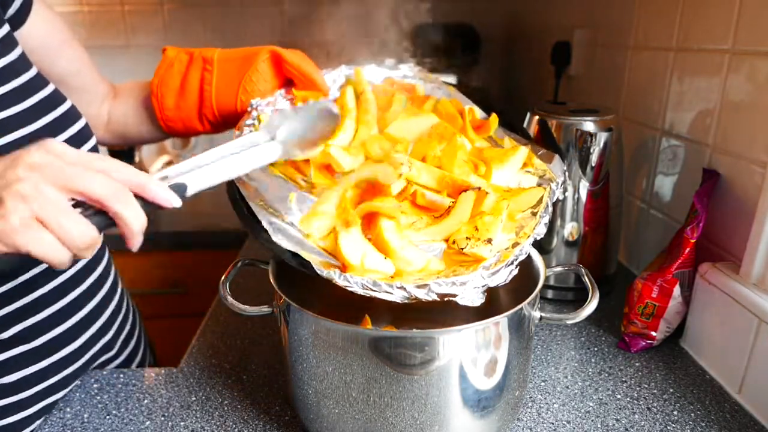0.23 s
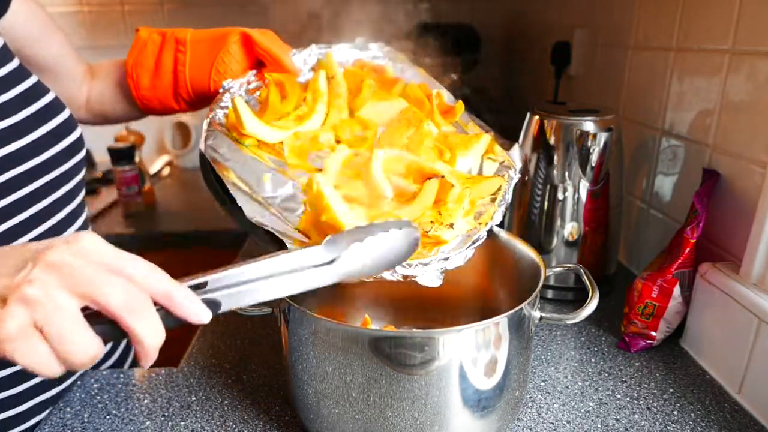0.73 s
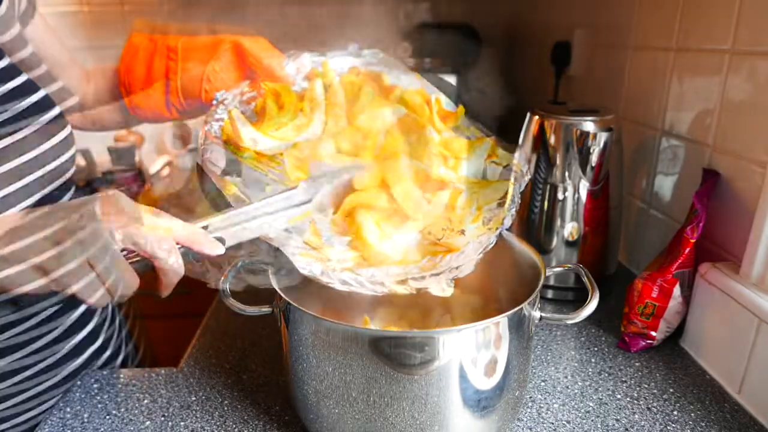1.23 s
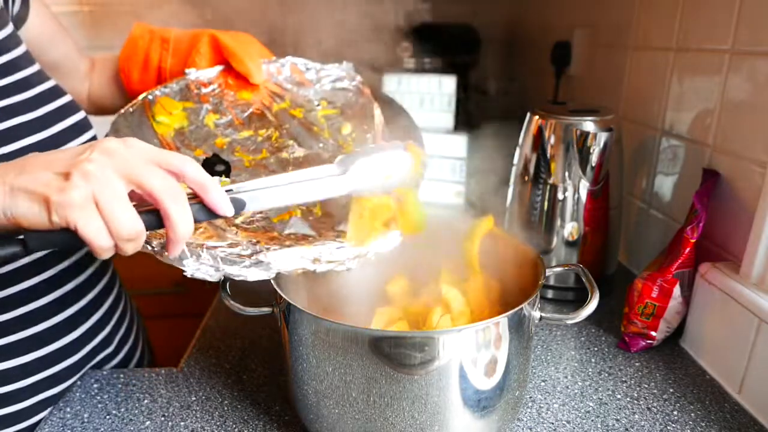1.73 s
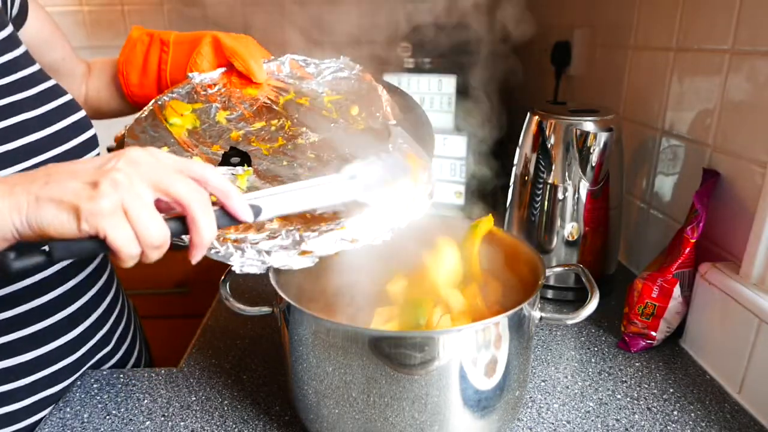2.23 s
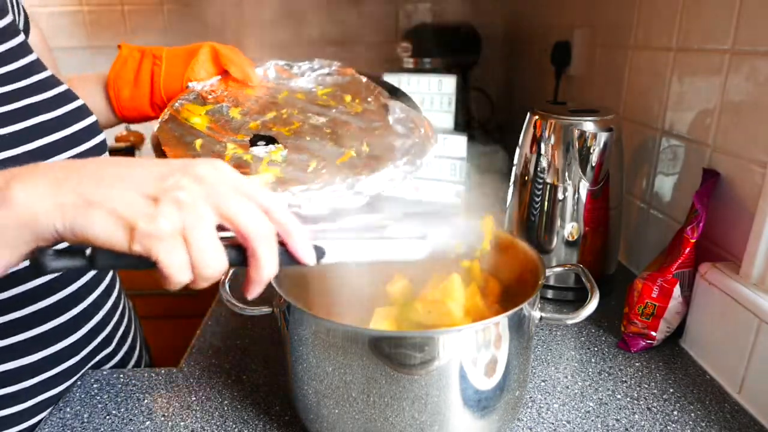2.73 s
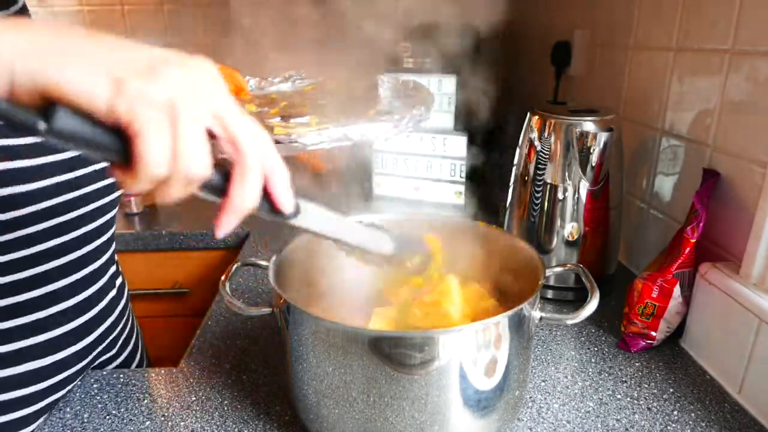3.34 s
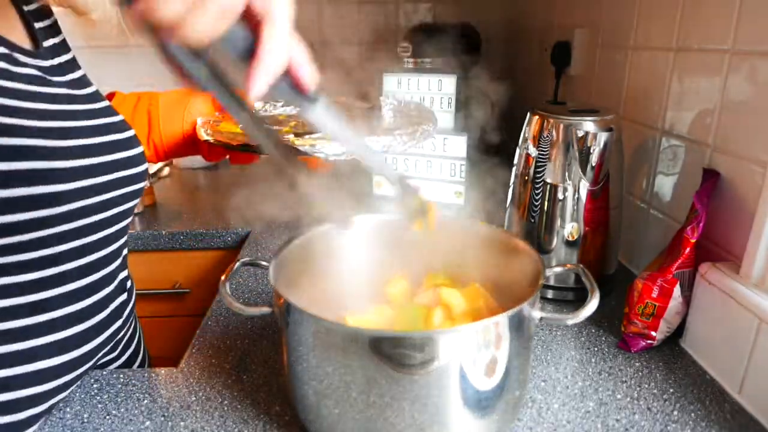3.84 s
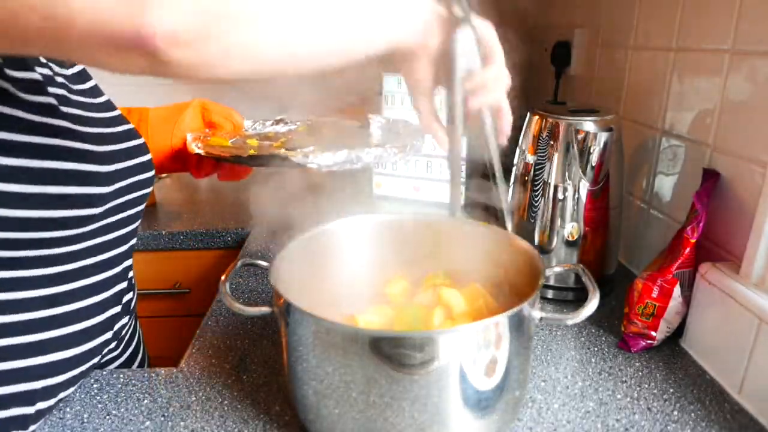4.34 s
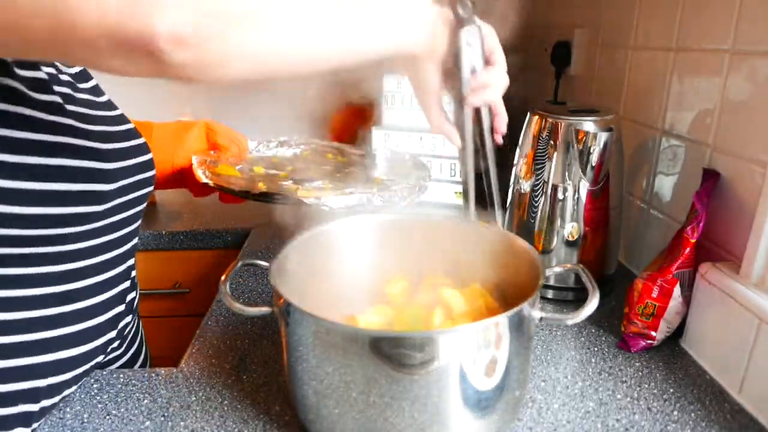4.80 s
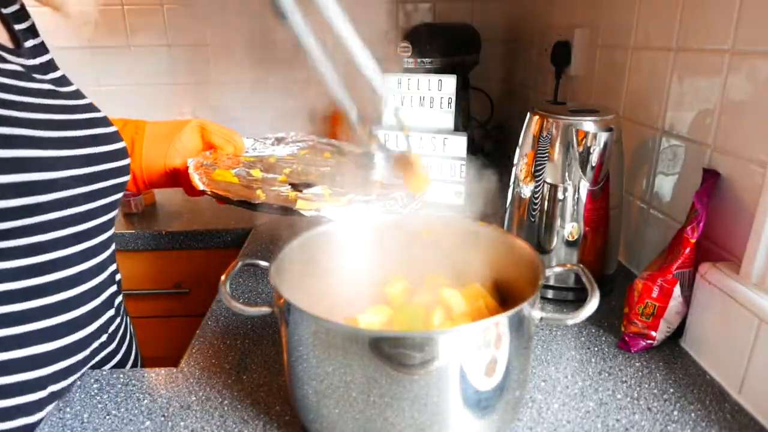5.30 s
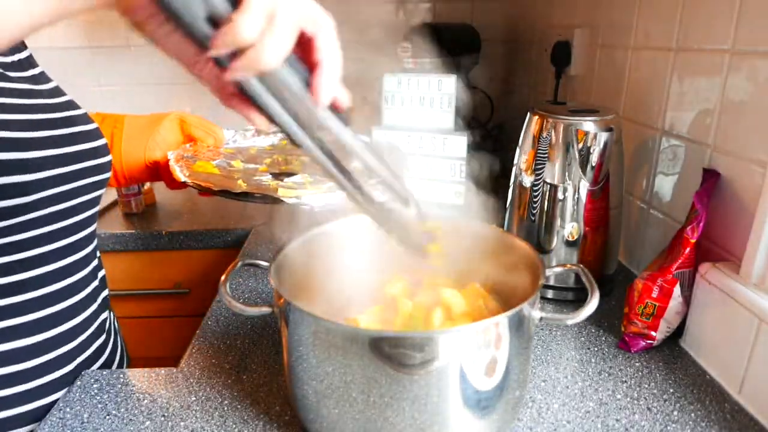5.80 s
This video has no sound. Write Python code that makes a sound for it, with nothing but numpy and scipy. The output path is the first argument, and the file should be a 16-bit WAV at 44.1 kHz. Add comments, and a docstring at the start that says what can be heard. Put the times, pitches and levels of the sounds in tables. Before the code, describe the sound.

Loud foil crackle, hissing scrapes and rumbling tray with soft pot thumps, then near silence, faint ticks and a single hollow clunk.

```python
"""A tiled kitchen, a stereo pair close to a foil-lined tray: steel tongs scrape roasted vegetables off it.
The foil crackles and hisses (dense clicks and noise), the tray rumbles under it (shaken resonances),
and pieces thump into a steel pot (beating low sines). Later come small foil ticks and one hollow knock
(ringing modes and a dense thud). Behind it all: the quiet drone of the kitchen with a mains hum."""
import sys
import numpy as np
from scipy import signal
from scipy.fft import rfft, irfft, next_fast_len
from scipy.io import wavfile

SR = 44100
rng = np.random.default_rng(int(sys.argv[2]) if len(sys.argv) > 2 else 0)


def waveform_to_disk(signal):
    """Save audio, clipped to [-1, 1], as 16-bit WAV at the path in sys.argv[1]."""
    frames = np.transpose(np.atleast_2d(signal))
    scaled = np.clip(frames, -1, 1) * 32767
    samples = np.round(scaled).astype(np.int16)
    wavfile.write(sys.argv[1], SR, samples)


N = 267242

# Level columns are relative: each source sets its final level in its own function.

# Spectrum of the appliances and distant air: pitch_hz, level_db
DRONE_SPECTRUM = [(70, -57), (120, -19), (230, -13.5), (350, -4.5), (410, -6.5), (480, -12.5), (620, -11.5),
                  (864, -8), (940, -15.5), (1450, -16), (2300, -22.5), (4200, -28.5), (6000, -27.5),
                  (8000, -32), (10000, -28.5), (15800, -36)]
# How alike the drone is at the two microphones: pitch_hz, likeness (-1 to 1)
DRONE_LIKENESS = [(60, -0.39), (150, 0.6), (380, 0.82), (950, -0.24), (2380, -0.17), (5980, 0.35),
                  (15000, 0.38)]
# Mains hum, before its slow drift: pitch_hz, level_db
HUM = [(100, -70), (200, -79), (300, -73), (400, -75)]
# Decay of the tiled room: pitch_hz, t60_s
ROOM_DECAY = [(150, 0.42), (500, 0.64), (2000, 0.9), (6000, 0.83), (15000, 0.13)]
# Stereo width of the room tail, side against mid: pitch_hz, side_db
ROOM_SPREAD = [(150, -14), (500, -11.5), (1500, -7), (15000, -5)]
# A blow and its rattling bounces: start_s, level_db
KNOCK_TOUCHES = [(4.523, -6.5), (4.536, -15), (4.547, -26.5), (4.572, -22)]
# Modes of the hollow body that is knocked: pitch_hz, level_db, t60_s
KNOCK_MODES = [(196, -4.5, 0.38), (229.7, -2, 0.2), (283, -14, 0.26), (346, -2, 0.28), (401, -1, 0.14),
               (550, -20, 0.4), (598, 5, 0.18), (652, 2, 0.23), (700, -6, 0.62), (774, -16, 0.22),
               (821, -5.5, 0.23), (898, -15, 0.44), (1000, -18, 0.18), (1142, -10, 0.13), (1273, -12, 0.14),
               (1332, -12, 0.18), (1425, -4, 0.23), (1633, -30, 0.26), (1740, -27, 0.36), (2340, -30, .3),
               (2520, -24, 0.22), (2930, -32, .35), (3075, -35, 0.37), (3860, -38, 0.47), (5000, -30, 0.21),
               (5060, -25, 0.13), (6150, -29, 0.2), (6780, -32, 0.18)]
# Spectrum of the dense part of the blow: pitch_hz, level_db
THUD_SPECTRUM = [(88, -50), (150, -27), (193, -4.5), (254, -10), (286, -5), (414, -11), (466, -10),
                 (601, -3), (837, -9.5), (979, -16.5), (1140, -11.5), (2020, -22.5), (4670, -38),
                 (6260, -34), (16000, -53)]
# Soft pieces landing in the pot: start_s, level_db, pitch_hz
THUMPS = [(0.342, -36.5, 207.6), (0.658, -25, 253), (1.05, -23.5, 256.2), (1.54, -23.5, 231.4),
          (1.801, -35.5, 238.4), (2.125, -33, 286), (2.901, -34, 250), (3.029, -46.5, 254),
          (5.508, -50, 291)]
# Thin metal rings of the tongs: start_s, level_db, pitch_hz, t60_s
PINGS = [(.311, -27, 2694, 0.13), (.311, -25, 3480, 0.035), (.311, -29, 4270, 0.036),
         (1.125, -36, 2015, 0.69), (1.475, -19.5, 3360, 0.027), (2.91, -59, 4400, 0.24),
         (2.92, -55, 7160, .08), (2.98, -56.5, 3610, .12), (3.035, -62, 3610, .12),
         (3.533, -49, 6120, 0.037), (3.537, -56, 2800, .1), (3.595, -68, 11800, 0.18)]
# The tongs bump the tray, which answers around one pitch: start_s, level_db, pitch_hz
BUMPS = [(.312, -33, 443), (.345, -29.5, 378), (.35, -27.5, 585), (.515, -25.5, 805), (.59, -19, 391),
         (.605, -23, 870), (.655, -29, 390), (.71, -24.5, 521), (.76, -18.5, 830), (.82, -28, 510),
         (1.17, -25.5, 815), (1.19, -27.5, 530), (1.468, -16.5, 915), (1.47, -29, 540), (1.56, -41, 775),
         (1.74, -24, 536), (1.765, -23, 790), (1.82, -29, 522), (2.125, -20, 830), (2.15, -23, 1140),
         (6.025, -48, 650)]
# Sharp snaps of the foil and touches of the tongs, loud while scraping, faint afterwards:
# start_s, level_db, pitch_hz
SNAPS = [(0.199, -21, 4700), (0.3102, -8.5, 2960), (0.3594, -20, 3900), (0.5594, -15, 4100),
         (0.6021, -11.5, 2450), (0.845, -7, 5230), (1.117, -11.5, 9200), (1.1776, -7, 2380),
         (1.257, -8.5, 3930), (1.472, -12, 3300), (1.633, -12, 9600), (1.728, -11.5, 5800),
         (1.787, -12, 3370), (2.051, -17.5, 5200), (2.1104, -5.5, 11100), (2.1265, -4, 5600),
         (2.153, -10, 1920), (2.197, -6.5, 9700), (2.622, -30, 4100), (3.155, -44, 9850),
         (3.1882, -37.5, 8900), (3.364, -29.5, 4960), (3.42, -44, 12000), (3.458, -42.5, 5370),
         (3.537, -41.5, 2840), (3.597, -42, 6000), (3.675, -43, 4900), (4.175, -44, 12700),
         (4.248, -47, 4030), (4.453, -33.5, 3540), (5.2794, -38.5, 5560), (5.4051, -43.5, 2980),
         (6.0264, -44, 2500)]
# Resonances of the tray: pitch_hz, width_hz, level_db
TRAY_MODES = [(141, 54, -23), (270, 25, -3), (372.4, 4.6, 7), (440, 30, 2), (522, 6.2, 2.5),
              (580, 16, -2.5), (641, 24, -7), (711, 27, -3.5), (770.5, 47, -1), (830, 17, 0), (932, 53, 1),
              (1040, 77, -3), (1167, 12.6, -4)]
# Spectrum of the foil: pitch_hz, level_db
FOIL_SPECTRUM = [(530, -34), (900, -3), (1060, -12.5), (1160, -6.5), (1430, -7), (1980, -6.5), (8000, -4.5),
                 (10000, -3), (14500, -6.5), (15600, -8.5)]
# Curves of four strokes of the tongs, then the foil faintly settling and a last light touch:
# start_s, rustle_db, treble_db (stretched in foil()), rumble_db
SCRAPE_CURVES = [
    [(0.0, -25, -2, -35.5), (0.08, -33, -8, -45.5), (0.15, -30, -3, -42.5), (0.22, -41, -5.5, -54),
     (0.3, -45, 0.5, -49)],
    [(0.31, -28, -7, -28.5), (0.35, -21, -6.5, -27), (0.42, -22.5, -4, -34), (0.46, -26, -6, -39.5),
     (0.56, -21.5, -6.5, -29.5), (0.61, -19.5, -5, -25.5), (0.73, -23, -9, -32.5), (0.79, -27, -4, -30.5),
     (0.99, -33.5, -8, -41), (1.04, -33, -12, -37.5), (1.1, -38.5, -18, -43)],
    [(1.13, -26, 1, -37), (1.18, -19.5, -8, -26), (1.22, -26.5, -2.5, -35), (1.35, -23.5, -3.5, -32.5),
     (1.46, -23.5, -3.5, -41), (1.48, -23.5, -13, -29), (1.6, -29.5, -7.5, -30), (1.64, -30, -1, -40),
     (1.7, -31, -2, -41.5), (1.75, -25.5, -2.5, -30.5), (1.99, -34.5, -4, -49.5), (2.1, -39.5, -0.5, -50)],
    [(2.13, -18.5, -3.5, -25.5), (2.23, -22, -4, -36.5), (2.3, -23.5, -3, -37.5), (2.38, -27, -2.5, -37.5),
     (2.44, -33, -4.5, -48), (2.57, -55, -4, -61), (2.66, -57, -2, -61.5), (2.85, -72, -27, -76)],
    [(2.95, -56.5, -16, -57), (3.29, -62, -15, -79), (3.38, -55, -20, -72), (3.85, -61.5, -20, -63),
     (3.92, -95, -15, -95)],
    [(5.99, -95, -15, -63), (6.026, -54, -17, -43.5), (6.06, -49, -15, -55)],
]
# Where the tray sounds most, one value per curve: four strokes, the settling, the last touch: pitch_hz
CONTACT_HZ = [537, 620, 660, 820, 450, 600]
# Edges of the half-octave bands of the room tail: pitch_hz
BAND_EDGES_HZ = 25 * 2 ** np.arange(0, 9.6, .5)

DRONE_DB = -55.5            # before its slow drift
AIR_DB = -81                # slow air on each microphone port
CUTOFF_HZ = 16050
FOIL_WIDTH_DB = -8.5        # creases all over the sheet reach the two microphones unlike
CONTACT_WANDER_OCT = 0.11   # the contact slides about
SNAP_DECAY_S, SNAP_BROAD_DB = 0.0073, -3   # fall to 1/e; broad part against pitched part
THUMP_T60_S = 0.41
BUMP_LOSS_DB = 400          # loss one octave off the pitch, growing with the square of the distance
BUMP_RING = 2.48            # t60_s times (width_hz + 6)


def from_db(db):
    """Decibels to gain."""
    return 10 ** (np.asarray(db) / 20)


def rms_one(x):
    """Scaled to rms 1."""
    return x / np.sqrt(np.mean(x ** 2) + 1e-20)


def in_time(rows):
    """The columns of a curve, one value per sample."""
    start_s, *columns = np.transpose(rows)
    return [np.interp(np.arange(N) / SR, start_s, column) for column in columns]


def at_hz(points, hz):
    """A spectrum table read on a log-frequency axis."""
    pitch_hz, value = np.array(points).T
    return np.interp(np.log(hz), np.log(pitch_hz), value)


def band(x, low, high):
    """Band-pass between two frequencies in Hz."""
    return signal.sosfilt(signal.butter(2, [low, high], "band", fs=SR, output="sos"), x)


def colour(x, spectrum):
    """Gives a sound the shape of a spectrum table."""
    size = next_fast_len(N)
    hz = np.maximum(np.fft.rfftfreq(size, 1 / SR), 1)
    return irfft(rfft(x, size) * from_db(at_hz(spectrum, hz)), size)[..., :N]


def drift(rate_hz):
    """Slow chance: noise through a double one-pole low-pass; rms 1."""
    r = np.exp(-2 * np.pi * rate_hz / SR)
    noise = rng.standard_normal(N + SR)
    return rms_one(signal.lfilter([1], [1, -2 * r, r * r], noise)[SR:])   # the first second settles


def ring(clicks, hz, t60):
    """A two-pole resonance: a unit click sets a sine of height 1 ringing."""
    r = from_db(-60 / (t60 * SR))
    w = 2 * np.pi * hz / SR
    return signal.lfilter([0, np.sin(w)], [1, -2 * r * np.cos(w), r * r], clicks + 1e-18)


def crackle(per_s, spread_db, clump_db):
    """Random clicks of uneven size that come in clumps; rms 1."""
    sizes = from_db(spread_db * np.minimum(rng.exponential(1, N), 5))
    signs = rng.choice([-1, 1], N)
    struck = rng.random(N) < per_s / SR
    return rms_one(sizes * signs * struck * from_db(clump_db * drift(62)))


def drone():
    """Appliances and distant air: coloured noise, partly alike left and right, and the mains hum."""
    hz, alike = np.array(DRONE_LIKENESS).T
    alike = np.clip(alike, -.98, .98)
    mid, side = colour(rng.standard_normal((2, N)), DRONE_SPECTRUM)
    mid = colour(mid, np.c_[hz, 10 * np.log10(1 + alike)])
    side = colour(side, np.c_[hz, 10 * np.log10(1 - alike)])
    air = from_db(DRONE_DB + .5 * drift(0.69)) * rms_one(mid + side * [[1], [-1]])
    t, hum = np.arange(N) / SR, 0
    for pitch_hz, db in HUM:
        hum = hum + from_db(db + 0.89 * drift(3.7)) * np.sqrt(2) * np.sin(2 * np.pi * pitch_hz * t)
    return air + hum


def kitchen(x):
    """Tiled walls: a dense noise tail that dies band by band, alike left and right in the bass."""
    t = np.arange(SR) / SR
    white, tail = rng.standard_normal((2, 2, SR)), 0
    for k, (low, high) in enumerate(zip(BAND_EDGES_HZ[2:], BAND_EDGES_HZ[3:])):
        hz = np.sqrt(low * high)
        t60 = max(at_hz(ROOM_DECAY, hz), .05)
        decay = from_db(-60 * t / t60) / np.sqrt(t60 * SR / 14)   # evens the energy of long and short tails
        mid, side = band(white[k % 2], low, high) * decay
        tail = tail + mid + from_db(at_hz(ROOM_SPREAD, hz)) * side * [[1], [-1]]
    tail = tail * -np.expm1(-(t / 0.003) ** 2)     # the first echoes need a few ms to arrive
    return signal.fftconvolve(x[None], tail, axes=1)[:, :N]


def knock():
    """The blow rings the modes of a hollow body, each touch in its own mix, inside a dense thud of weak modes."""
    start_s, levels = np.array(KNOCK_TOUCHES).T
    at = [round(s * SR) for s in start_s]
    clicks, body = np.zeros(N), 0
    for k, (hz, db, t60) in enumerate(KNOCK_MODES):
        clicks[at] = from_db(levels + rng.normal(0, 3.0, len(at)))
        body = body + from_db(db - 16.5) * (-1) ** k * ring(clicks, hz, t60)
    clicks[at] = from_db(levels)
    fade = np.exp(-1 / (0.024 * SR))
    envelope = signal.lfilter([1], [1, -fade], clicks)
    grain = crackle(3000, spread_db=2.5, clump_db=-1.5)
    thud = envelope * rms_one(colour(grain, THUD_SPECTRUM))
    return body + from_db(-14.5) * thud


def thumps():
    """A soft landing swells within a few ms and rings low in the half-filled pot."""
    out, t = np.zeros(N + SR), np.arange(SR // 2) / SR
    for s, db, hz in THUMPS:
        # two close modes beat
        pair = np.sin(2 * np.pi * hz * t) + .5 * np.sin(2 * np.pi * .9 * hz * t)
        swell = -np.expm1(-t / 0.0032)
        out[round(s * SR):][:len(t)] += from_db(db - 8.5 - 60 * t / THUMP_T60_S) * swell * pair
    return out[:N]


def pings():
    """Single modes of the steel arms, set off by a light touch; loose contact makes them flutter."""
    rings = 0
    for s, db, hz, t60 in PINGS:
        click = 1. * (np.arange(N) == round(s * SR))
        rings = rings + from_db(db) * ring(click, hz, t60)
    return rings * from_db(1.0 * drift(40))


def bumps():
    """A blunt contact: the tray resonances near its pitch swell within a few ms, waver a little and die."""
    out, t = np.zeros(N + SR), np.arange(SR // 2) / SR
    hz, width, _ = np.transpose(TRAY_MODES)[:, :, None]
    chance = rng.uniform(-1.06, 1, (len(BUMPS), 2))
    for (s, db, near_hz), (phase, detune) in zip(BUMPS, chance):
        # each resonance beats with a detuned twin
        twin = np.sin(2 * np.pi * (hz + 60 * detune) * t + np.pi * phase)
        pair = np.sin(2 * np.pi * hz * t) + 0.64 * twin
        reach_db = -BUMP_LOSS_DB * np.log2(hz / near_hz) ** 2
        level = from_db(db + reach_db - 60 * t * (width + 6) / BUMP_RING)
        out[round(s * SR):][:len(t)] += -np.expm1(-t / 0.0047) * np.sum(level * pair, axis=0)
    return out[:N]


def snaps():
    """Each snap is a sharp crack and a short burst of noise, strongest around its own pitch."""
    out, t = np.zeros(N + SR), np.arange(SR // 10) / SR
    noise = rng.standard_normal((len(SNAPS), len(t)))
    for (s, db, hz), burst in zip(SNAPS, noise):
        burst = burst * (np.exp(-t / SNAP_DECAY_S) + 0.39 * np.exp(-t / 0.00035))
        broad = band(burst, 1130, 12200)
        pitched = band(burst, hz / 1.28, min(hz * 1.25, 18000))
        sound = from_db(SNAP_BROAD_DB) * broad + pitched
        out[round(s * SR):][:len(t)] += from_db(db - 5.5) * sound / np.abs(sound).max()
    return out[:N]


def tray(rumble_db, centre_hz):
    """Sliding pieces shake the resonances in fits, most those near the contact, over a broad rumble."""
    shake = crackle(1500, spread_db=3.5, clump_db=1.0)
    modes = 0
    for hz, width, db in TRAY_MODES:
        off_contact_db = np.minimum(14 * np.log2(hz / centre_hz) ** 2, 9)
        level = from_db(db + 4.5 * drift(18.0) - off_contact_db)
        modes = modes + level * rms_one(ring(shake, hz, 3.8 / width))
    broad = rms_one(band(shake, 244, 1080))
    return from_db(rumble_db - 2.5) * rms_one(rms_one(modes) + from_db(-3.5) * broad)


def foil(rustle_db, treble_db):
    """Dense creasing over a friction hiss, coloured by the foil; the top octaves follow the treble curve."""
    creases = crackle(6000, spread_db=1.5, clump_db=3.0)
    hiss = from_db(-2) * rng.standard_normal(N)
    coloured = rms_one(colour(creases + hiss, FOIL_SPECTRUM))
    dull = signal.filtfilt(*signal.butter(1, 7000, fs=SR), coloured)
    treble = from_db(1.88 * (treble_db + 1.5)) * (coloured - dull)
    return from_db(rustle_db) * (dull + treble)


def scene():
    """All sources close to the microphones, their tail in the kitchen and the drone."""
    rows = [(*row, hz) for curve, hz in zip(SCRAPE_CURVES, CONTACT_HZ) for row in curve]
    rustle_db, treble_db, rumble_db, centre_hz = in_time(rows)
    centre_hz = centre_hz * 2 ** (CONTACT_WANDER_OCT * drift(5))
    near = foil(rustle_db, treble_db) + tray(rumble_db, centre_hz)
    near = near + snaps() + pings() + bumps() + thumps()
    wide = foil(rustle_db + FOIL_WIDTH_DB, treble_db) * [[1], [-1]]
    blow = knock()
    tail = kitchen(from_db(-6.0) * near + from_db(-3) * blow)
    return near + wide + blow + tail + drone()


def record(dry):
    """The microphones lose the deep bass and add a faint rumble of their own; the top is cut."""
    thin = signal.sosfilt(signal.butter(4, 110, "high", fs=SR, output="sos"), dry)
    air = from_db(AIR_DB) * rms_one(band(rng.standard_normal((2, N)), 15, 130))
    return signal.sosfilt(signal.cheby2(22, 60, CUTOFF_HZ, fs=SR, output="sos"), thin + air)


dry = scene()
out = record(dry)
waveform_to_disk(out)
```